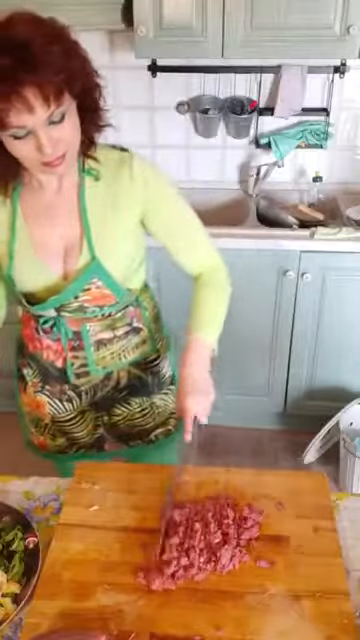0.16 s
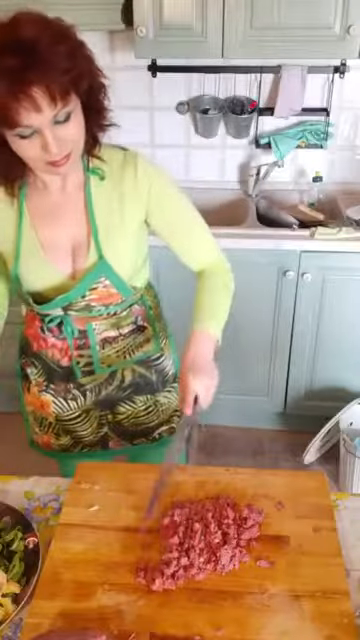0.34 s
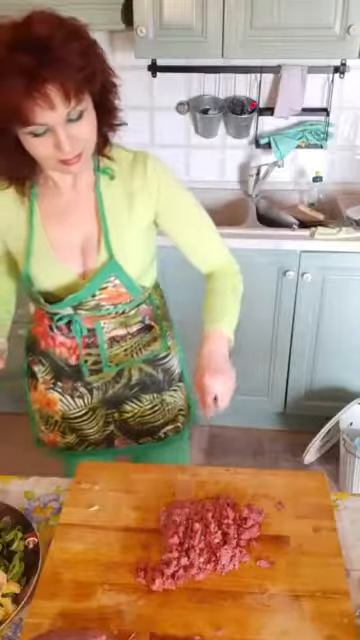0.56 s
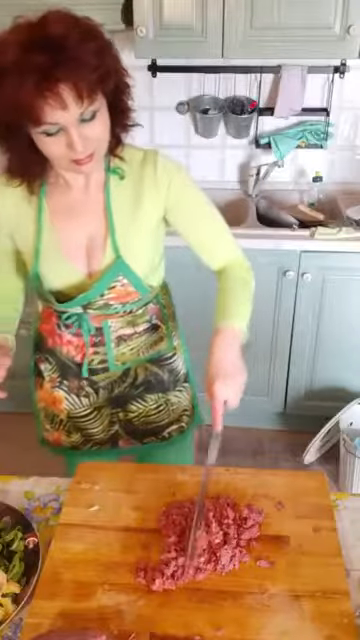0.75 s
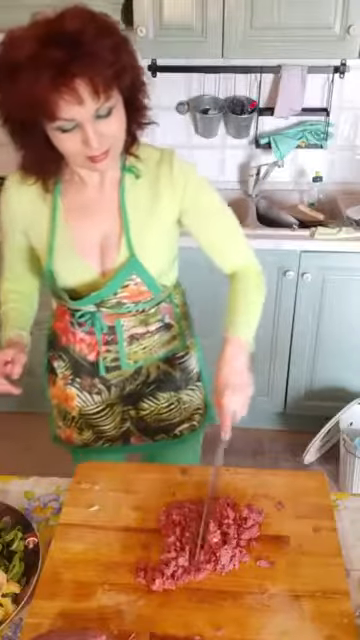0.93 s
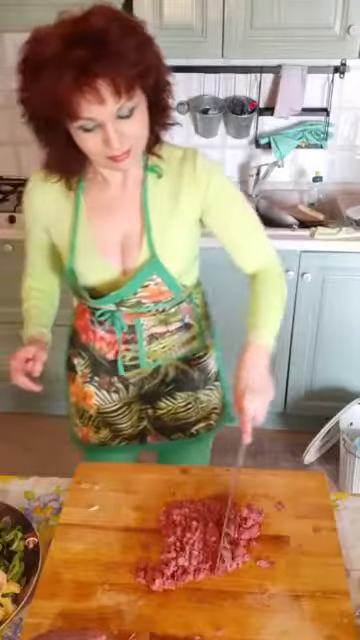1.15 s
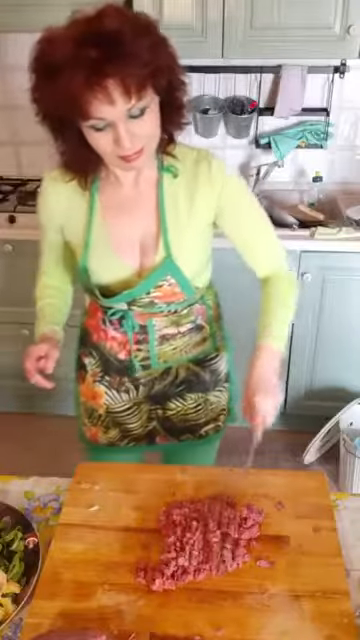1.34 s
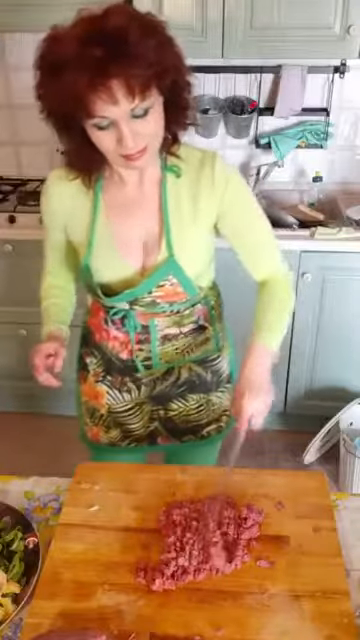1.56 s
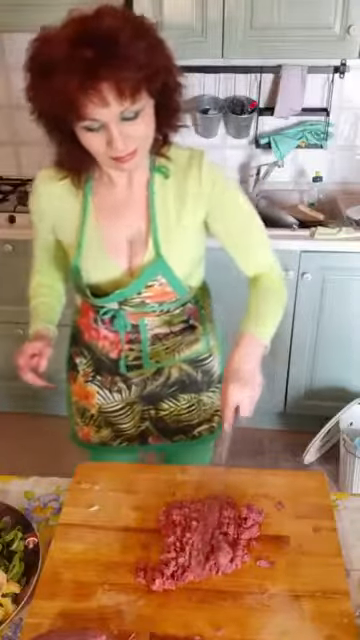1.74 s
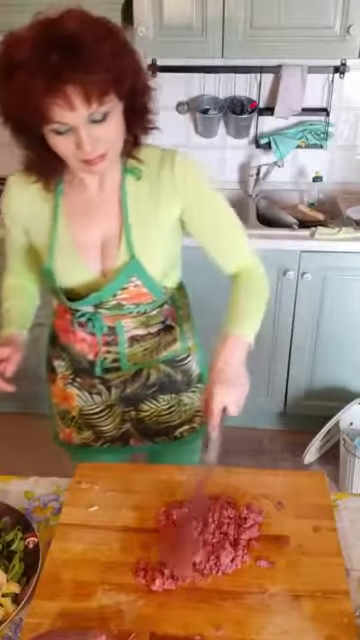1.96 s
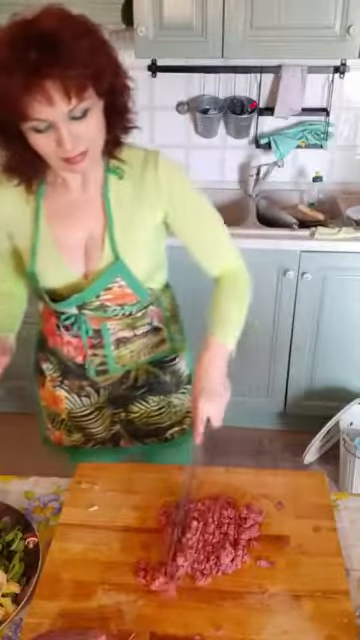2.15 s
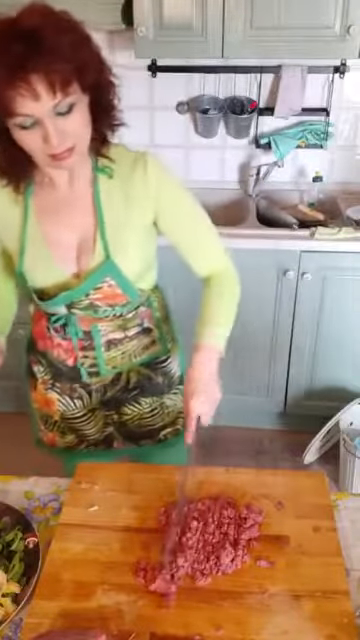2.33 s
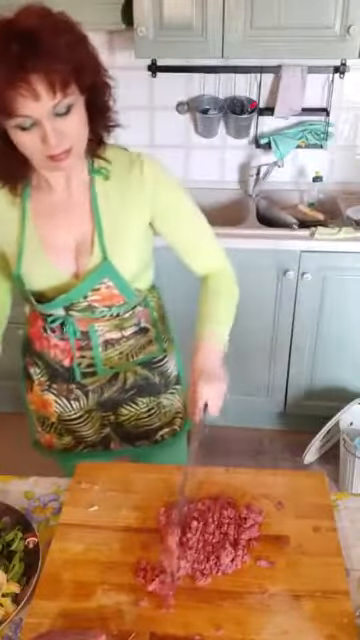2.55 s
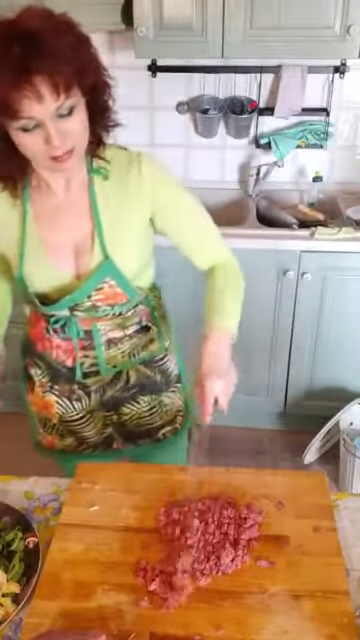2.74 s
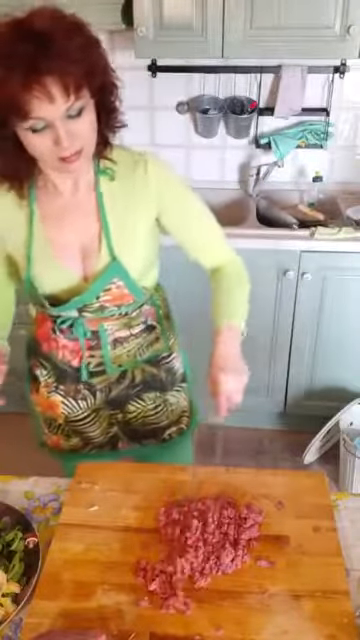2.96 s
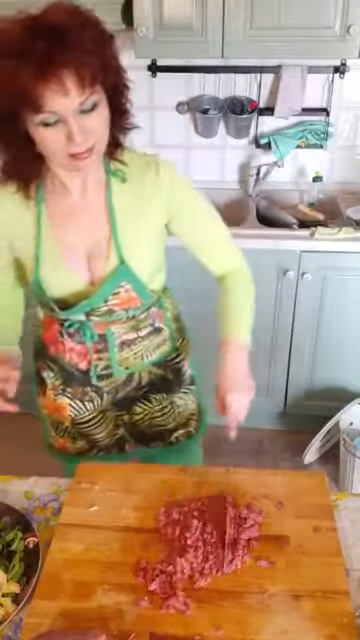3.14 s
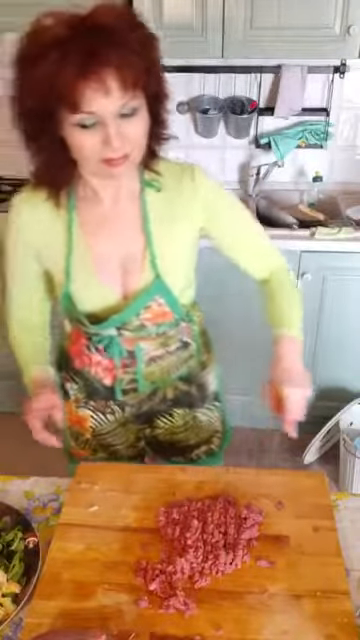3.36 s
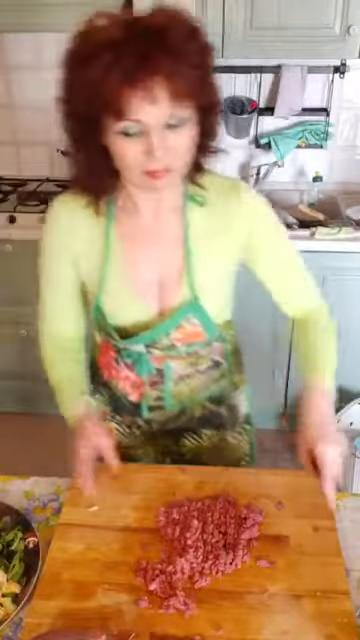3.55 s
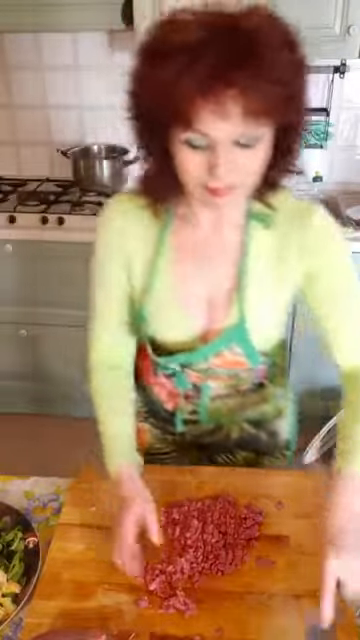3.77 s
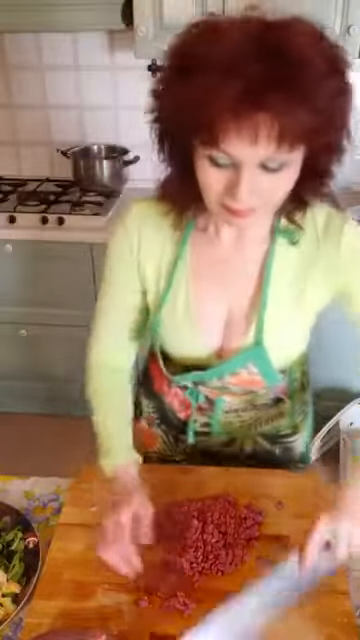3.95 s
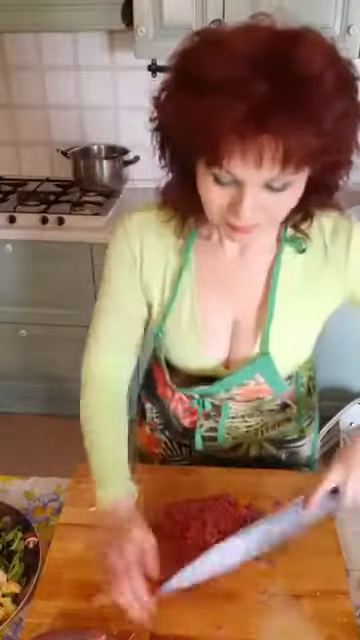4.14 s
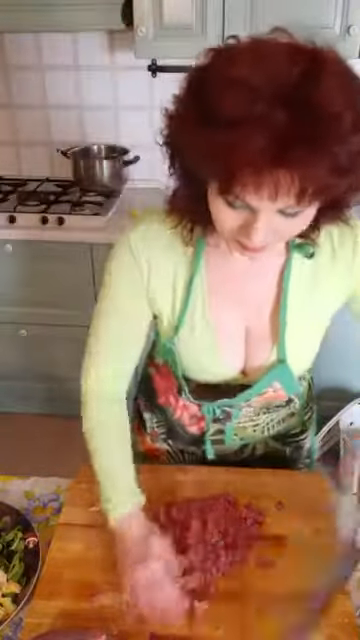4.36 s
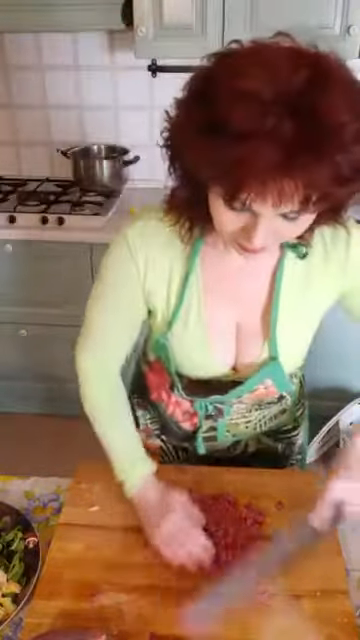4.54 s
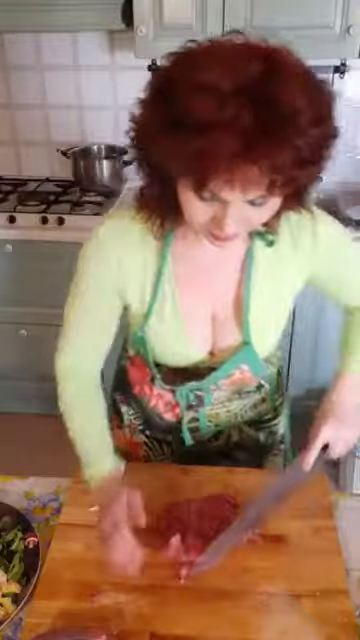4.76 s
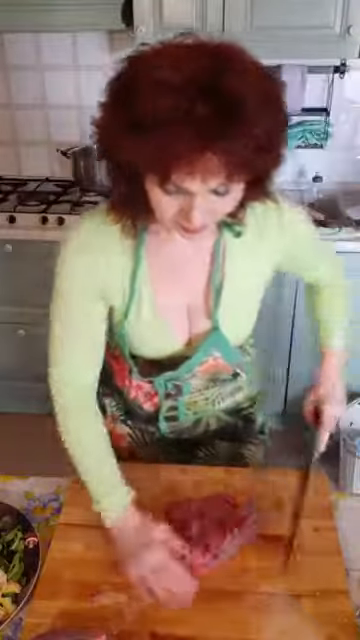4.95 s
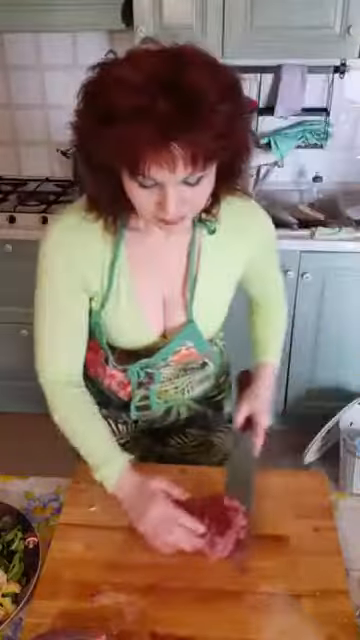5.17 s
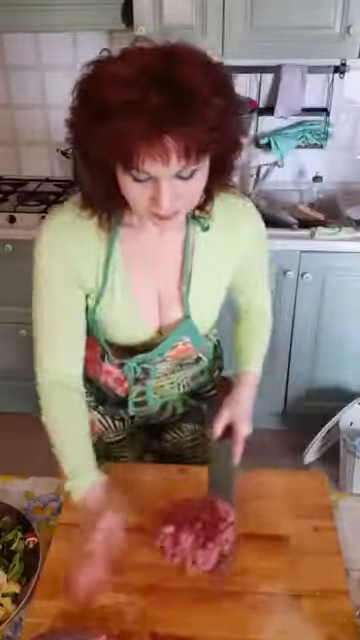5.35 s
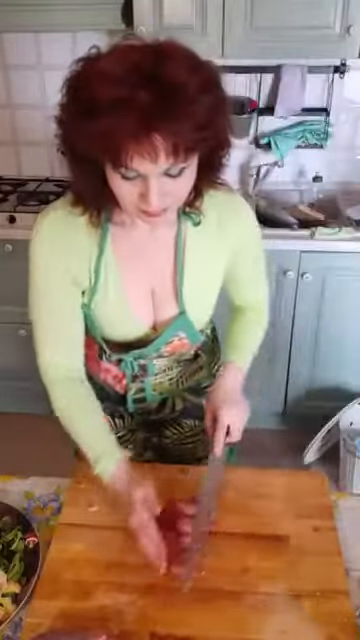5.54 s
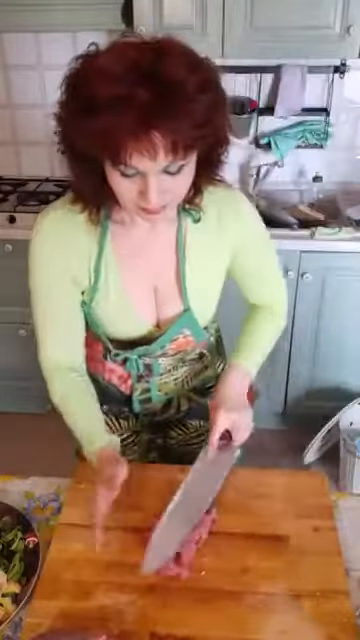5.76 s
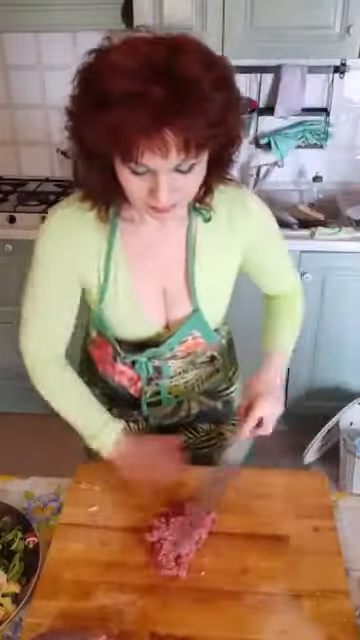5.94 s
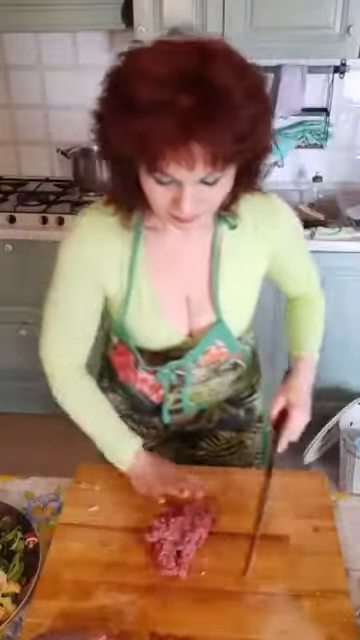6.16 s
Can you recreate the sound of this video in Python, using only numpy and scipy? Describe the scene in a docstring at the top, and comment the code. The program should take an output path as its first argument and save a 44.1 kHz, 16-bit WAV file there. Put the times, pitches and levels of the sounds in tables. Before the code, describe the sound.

A large knife chops minced meat on a thick wooden board, about four loud knocks a second, then scrapes and pats the meat together.

```python
"""A large knife chops minced meat on a thick wooden board, four blows a second, in a hard-walled kitchen.
Each blow is a short pulse shaped by meat, wood and steel, with crunch, hiss, spray and ringing tones.
Then the blade is set down and scrapes the meat together (juddering noise and a rough moan) while a hand
pats it into a heap (soft noise swells), and sticky meat peels off in a rustle.
The room rings on in scattered echoes and standing waves; an appliance hums faintly as steady tones in air noise."""
import sys
import numpy as np
from scipy import signal
from scipy.fft import rfft, irfft, next_fast_len
from scipy.io import wavfile
from scipy.ndimage import uniform_filter1d

SR = 44100
rng = np.random.default_rng(int(sys.argv[2]) if len(sys.argv) > 2 else 0)


def transcribe(signal):
    """Save signal, clipped to [-1, 1], as a 16-bit WAV file at the path in sys.argv[1]."""
    frames = np.atleast_2d(signal).T
    limited = np.clip(frames, -1, 1)
    pcm = np.round(limited * 32767).astype(np.int16)
    wavfile.write(sys.argv[1], SR, pcm)


N = 273420

# spectral shape of wet meat, as smack, hiss or rustle: (f/Hz, relative level/dB per Hz)
WET_MEAT = [(200, -21.5), (900, -9), (2000, -5.5), (4500, 0.5), (8000, -12), (15000, -12.5)]


def amp(db):
    """Decibels to gain."""
    return 10 ** (np.asarray(db) / 20)


def unit(x):
    """Scale to rms 1."""
    return x / np.sqrt(np.mean(x ** 2) + 1e-20)


def along(points, hz):
    """Read (f/Hz, value) points on a log frequency axis."""
    f, v = np.transpose(points)
    return np.interp(np.log(hz + 1), np.log(f + 1), v)


def filtered(x, response):
    """Multiply the spectrum of x by a response of frequency."""
    n = x.shape[-1]
    m = next_fast_len(n + SR // 10)
    hz = np.fft.rfftfreq(m, 1 / SR)
    return irfft(rfft(x, m) * response(hz), m)[..., :n]


def coloured(x, spectrum):
    """Give x a (f/Hz, level/dB) colour, at rms 1."""
    return unit(filtered(x, lambda hz: amp(along(spectrum, hz))))


def causal(gain):
    """The sharpest-starting (minimum-phase) pulse that has this gain spectrum."""
    cepstrum = irfft(np.log(np.maximum(gain, 1e-6)))
    half = len(cepstrum) // 2
    cepstrum[1:half] *= 2
    cepstrum[half + 1:] = 0
    return irfft(np.exp(rfft(cepstrum)))


def add(track, s, sound):
    """Mix a sound into the track from time s."""
    part = track[..., max(round(s * SR), 0):][..., :sound.shape[-1]]
    part += sound[..., :part.shape[-1]]


def gritty(n, grit_db, rate):
    """Rough noise: its level wanders between random values, rate of them a second."""
    knots = rng.standard_normal(SR)
    level = np.interp(np.arange(n) * rate / SR, np.arange(SR), knots)
    return unit(rng.standard_normal(n) * amp(grit_db * level))


def diffuse(pair):
    """Two unrelated signals become a sound field: alike in the bass, loosely related or opposed above."""
    # likeness of the sound at the two microphones: (f/Hz, correlation -1..1)
    alike = [(60, 0.99), (180, 0.95), (350, 0.88), (700, 0.28), (1300, -0.34), (2500, 0.25), (8000, -0.28)]

    def mid_and_side(hz):
        turn = np.arccos(np.clip(along(alike, hz), -1, 1)) / 2
        return np.array([np.cos(turn), np.sin(turn)])

    mid, side = filtered(pair, mid_and_side)
    return np.array([mid + side, mid - side])


def reflections(build=0.0012, hold=0.029, sparse_db=3, sparse_time=0.055):
    """The walls' answer: scattered echoes thicken into an even tail, fading at a rate set by frequency."""
    # the kitchen's decay: (f/Hz, t60/s)
    kitchen = [(80, 0.94), (200, 0.62), (550, 0.6), (1500, 0.74), (4000, 0.67), (7000, 0.53), (14000, 0.26)]
    t = np.arange(SR) / SR
    unevenness_db = sparse_db * np.exp(-t / sparse_time) * rng.standard_normal((2, SR))
    echoes = rng.standard_normal((2, SR)) * amp(unevenness_db)
    echoes *= 1 - np.exp(-(t / build) ** 2)
    hz, age, z = signal.stft(echoes, SR, nperseg=256)
    z = z * amp(-60 * np.maximum(age - hold, 0) / along(kitchen, hz)[:, None])
    tail = signal.istft(z, SR, nperseg=256)[1][:, :SR]
    spectrum = rfft(tail, 2 * SR)
    # level the smoothed spectrum so that the tail has no broad colour of its own
    smooth = np.sqrt(np.abs(uniform_filter1d(np.abs(spectrum) ** 2, size=160, axis=1)))
    return diffuse(irfft(spectrum / smooth)[:, :SR])


def standing_waves(level_db=-61, build=0.036):
    """A few room modes ring on as decaying sines within the tail."""
    # standing waves of the kitchen: (f/Hz, relative level/dB, t60/s)
    modes = [(100, -12, 0.48), (118.4, -9.5, .75), (160.4, -4.5, 0.81), (286, -5.5, 0.55), (533, 2, 0.26),
             (774, 4.5, 0.56), (900, 3, .7), (1014, -1, .7), (1101, 5, 0.45), (1306, -2, .7)]
    t = np.arange(SR) / SR
    waves = np.zeros((2, SR))
    for hz, db, t60 in modes:
        phase = rng.uniform(0, 2 * np.pi, (2, 1))
        waves += amp(db - 60 * t / t60) * np.sin(2 * np.pi * hz * t + phase)
    return diffuse(amp(level_db) * waves * (1 - np.exp(-t / build)))


def in_kitchen(sound, walls, wet_db, change=0.09, lag=0.00038):
    """Direct sound plus room; a share of the echoes is new for each sound, as the knife and the cook move."""
    # distinct echoes from board, cook and cupboards: (delay left/s, delay right/s, level re direct/dB)
    near = [(.0015, 0.00085, -4.5), (.0086, 0.009, -7.5), (.0176, 0.024, -7.5), (.0241, 0.027, -8)]
    response = amp(wet_db) * (np.sqrt(1 - change) * walls + np.sqrt(change) * reflections())
    direct = (lag, 0, 0)  # the left ear hears it a little later
    for left, right, db in [direct] + list(near):
        response[[0, 1], [round(left * SR), round(right * SR)]] += amp(db)
    return signal.fftconvolve(sound[None], response, axes=1)


def through_blade(force, ring_db, vary_db=2):
    """The steel rings along with what touches it; clinging meat shifts each tone a little."""
    # thin ringing tones of the blade, before random variation: (f/Hz, relative level/dB, t60/s)
    tones = [(2700, -5.5, .16), (3140, -4, 0.16), (3210, -1, .18), (3690, 0, 0.12), (4320, 4, .17),
             (5340, 3.5, 0.12), (6500, -5, 0.17), (8040, 4.5, 0.24), (8730, 0, .15), (9200, -4.5, .12)]
    t = np.arange(SR // 4) / SR
    ring = np.zeros(len(t))
    for hz, db, t60 in tones:
        strength_db = db + vary_db * rng.standard_normal()
        shifted_hz = hz * (1 + .015 * rng.standard_normal())
        ring += amp(strength_db - 60 * t / t60) * np.cos(2 * np.pi * shifted_hz * t)
    ring *= amp(ring_db)
    ring[0] += 1  # the contact itself
    return signal.fftconvolve(force, ring)


def blow(thud_db, knock_db, edge_db, wood_db, vary_db=2.76, crunch_db=6, crunch_time=0.0039, size=4096):
    """The edge crunches through the meat and strikes the wood; each blow rings a little differently."""
    # where thud, knock, plain wood, bite and edge lie in a blow: (f/Hz)
    registers = [130, 310, 1400, 2300, 4500]
    # spectral shape of one blow through meat into wood: (f/Hz, relative level/dB per Hz)
    chop = [(40, -24), (64, -18), (82, -6), (120, -3.5), (165, -2.5), (230, -10), (400, -9.5), (600, -5.5),
            (1000, 1), (1500, -1), (1900, -7), (3000, -20), (5000, -25.5), (7500, -38), (15000, -55.5)]
    # resonances of the board and the blade in it, before random variation: (f/Hz, width/Hz, lift/dB)
    board = [(300, 19, 1.5), (552, 88, 4), (931, 92, -0.5), (1560, 250, 3), (2385, 350, 6.5),
             (3510, 420, 4.5), (4080, 470, 5.5), (5330, 580, 1)]
    hz, t = np.fft.rfftfreq(size, 1 / SR), np.arange(size) / SR

    def peak(centre, width):
        return 1 / (1 + (2 * (hz - centre) / width) ** 2)

    rings_db = wood_db * peak(1450, 550)
    for f, width, lift_db in board:
        shift = 1 + .025 * rng.standard_normal()
        rings_db += (lift_db + vary_db * rng.standard_normal()) * peak(f * shift, width)
    # a bare edge bites into the wood, meat muffles it
    bite_db = -.2 + .62 * edge_db - .4 * thud_db
    contact_db = along(list(zip(registers, [thud_db, knock_db, 0, bite_db, edge_db])), hz)
    pulse = causal(unit(amp(along(chop, hz) + rings_db)) * amp(contact_db))
    # differencing tilts the noise of tearing fibres to the treble
    crunch = np.diff(rng.standard_normal(size) * np.exp(-t / crunch_time), prepend=0)
    force = amp(crunch_db) * crunch / np.linalg.norm(crunch)
    force[0] += 1  # the impact
    return through_blade(signal.fftconvolve(force, pulse)[:size], ring_db=-52.5)


def earlier_blow(walls, before=0.092, level_db=8):
    """The chopping is already under way: the room still rings from the blow before."""
    whole = amp(level_db) * in_kitchen(blow(0, 0, 0, 0), walls, wet_db=1.5)
    ring = whole[:, round(before * SR):]
    return np.pad(ring, ((0, 0), (0, N - ring.shape[1])))


def background(air_db=-72):
    """Still air as coloured noise, and the hum of an appliance as steady sines."""
    # spectral shape of the air noise: (f/Hz, relative level/dB per Hz)
    air = [(18, -41.5), (30, -3.5), (70, 2), (345, -10), (584, -8.5), (760, -9.5), (937, -22.5), (1960, -8),
           (3140, -19.5), (4780, -13.5), (8080, -21), (9710, -22), (16000, -13.5)]
    # appliance tones before they are spread in stereo: (f/Hz, level/dB rms)
    hum_tones = [(85, -85.5), (147, -86), (640, -93), (738, -90), (787, -82)]
    t = np.arange(N) / SR
    hum = np.zeros((2, N))
    for hz, db in hum_tones:
        hum += amp(db) * np.sqrt(2) * np.sin(2 * np.pi * (hz * t + rng.random((2, 1))))
    hiss = coloured(diffuse(rng.standard_normal((2, N))), air)
    return amp(air_db) * hiss + diffuse(hum)


def struck(hz, t60, attack):
    """One mode of blade, board or table, set swinging by a blow: a decaying sine."""
    t = np.arange(SR // 4) / SR
    return np.sin(2 * np.pi * hz * t) * amp(-60 * t / t60) * (1 - np.exp(-t / attack))


def squelch(rise=.012, length=0.14):
    """Juice and fibres are squeezed out beside the blade in a short crackling spray."""
    # spectral shape of wet meat squirting from under the edge: (f/Hz, relative level/dB per Hz)
    spray = [(1000, -18.5), (3000, 2.5), (5000, 5), (7500, 0), (10000, -12), (15000, -11.5)]
    t = np.arange(SR // 5) / SR
    crackle = np.array([gritty(len(t), grit_db=4, rate=500) for channel in range(2)])
    return coloured(crackle, spray) * (1 - np.exp(-t / rise)) * np.exp(-(t / length) ** 2)


def chopping(walls, lead=0.0063, slice_db=-48, spray_db=-55, tick_db=-28.5, clack_db=-19.0,
             thump_db=-33, thump_growth=2.8):
    """The edge hisses into the meat, then the blow; close by, steel ticks, board clacks, table thumps."""
    # the blade meets the board: (t/s, blow level/dB, cushioning by the meat/dB, steel edge/dB)
    blows = [(0.0492, 8, -2.5, 0.5), (0.2838, 10, -6, -2), (0.528, 10, -6, -1), (0.767, -3.5, 10, -5.5),
             (1.0, 8, -3.5, -1.5), (1.246, 9, -2.5, -4.5), (1.486, 9, -3.5, -2), (1.7339, 8, -1, 4),
             (1.9759, 8, 0, -2.5), (2.2277, 7.5, -1.5, -0.5), (2.472, 8.7, 0, 1.3), (2.7199, 9.5, -4, -1.5),
             (2.9577, 10.4, -4.5, -1.5), (3.196, 10.3, -5, -1.3), (3.8607, -13, 1, 17.5),
             (4.4577, -3, -6.5, -5), (5.043, -3.8, 4.5, -2.5)]
    track = np.zeros((2, N))
    for s, db, cushion_db, edge_db in blows:
        knock_db = 5.8 + .65 * cushion_db + .45 * edge_db  # the hollow knock
        wood_db = 2 + 0.53 * rng.standard_normal()  # the woody clack differs from spot to spot
        sound = blow(cushion_db, knock_db, edge_db, wood_db)
        add(track, s, amp(db) * in_kitchen(sound, walls, wet_db=10.0))
        spot = np.exp(.08 * rng.standard_normal())
        # a cushioned blow ticks less and puts more of its push into the table
        tick = amp(tick_db + (edge_db - cushion_db) / 2) * struck(hz=5000 * spot, t60=0.0068, attack=.0003)
        thump = amp(thump_db + thump_growth * cushion_db) * struck(hz=142, t60=0.016, attack=0.0026)
        clack = amp(clack_db + wood_db) * struck(hz=1476, t60=0.021, attack=0.00017)
        add(track, s, amp(db) * (tick + clack + thump))
        add(track, s, amp(db + edge_db + spray_db) * squelch())
        hiss = coloured(rng.standard_normal((2, round(lead * SR))), WET_MEAT)
        add(track, s - lead, amp(db + slice_db) * hiss * np.linspace(0, 1, hiss.shape[1]))
    return track


def swell_and_fade(t, rise, length, fade_db_per_s):
    """A smooth rise, a hold until length, then a steady fall in dB."""
    swell = np.sin(np.pi / 2 * np.minimum(t / rise, 1)) ** 2
    return swell * amp(-fade_db_per_s * np.maximum(t - length, 0))


def moan(pitch, width_hz=38):
    """The dragged blade bends and chatters in a rough, wavering tone that the table carries."""
    n = len(pitch)
    sway = unit(filtered(rng.standard_normal((2, n)), lambda hz: 1 / (1 + (hz / width_hz) ** 2)))
    phase = 2 * np.pi * np.cumsum(pitch) / SR
    return unit((1 + sway[0]) * np.cos(phase) + sway[1] * np.sin(phase))


def scraping(walls, press_s=0.13, lift_db_per_s=279, gather_db_per_s=41,
             moan_rise_s=.2, moan_fade_db_per_s=140, moan_bend=.12):
    """The edge judders over the grain; meat gathering under it fills out the low part of the rub."""
    # the blade sweeps over the wood; the meat level is where its growth starts:
    # (start t/s, length/s, rub level/dB, meat under the blade/dB, moan f/Hz, moan level/dB)
    sweeps = [(3.868, 0.25, -48, -10.5, 471.6, -50.5), (4.512, 0.23, -42, -6.5, 376, -50.5)]
    # spectral shape of steel rubbing wood: (f/Hz, relative level/dB per Hz)
    steel_on_wood = [(40, -30), (120, -19.5), (280, 1.5), (800, 2), (1500, 7), (2100, -3), (3200, 2),
                     (4300, 1.5), (5500, -6), (7000, -5), (10000, -8), (15000, -15)]
    track = np.zeros((2, N))
    t = np.arange(SR // 2) / SR
    for s, length, rub_db, meat_db, moan_hz, moan_db in sweeps:
        # pressure builds up, holds, and falls as the blade lifts
        pressure = swell_and_fade(t, press_s, length, lift_db_per_s)
        judder = gritty(len(t), grit_db=3, rate=400)
        rub = coloured(judder, steel_on_wood)
        low = filtered(rub, lambda hz: 1 / (1 + (hz / 1400) ** 2))
        # meat piles up in front of the moving blade
        gathered = amp(meat_db + gather_db_per_s * t) * low
        rub = amp(rub_db) * pressure * (rub - low + gathered)
        add(track, s, in_kitchen(through_blade(rub, ring_db=-46), walls, wet_db=-6.5))
        # the moan builds slowly and starts flat by the share moan_bend
        chatter = swell_and_fade(t, moan_rise_s, length, moan_fade_db_per_s)
        pitch = moan_hz * (1 - moan_bend * np.maximum(1 - t / moan_rise_s, 0))
        add(track, s, amp(moan_db) * chatter * moan(pitch))
    return track


def patting(walls):
    """Each press of the hand is a soft swell on the board with sticky crackle on top."""
    # the hand presses and shifts the meat: (loudest t/s, length/s, level/dB, wet smack re push/dB)
    pats = [(4.898, .06, -62, -9), (5.019, .012, -57, -26), (5.171, .06, -47, -17), (5.245, .04, -54, -3),
            (5.399, .045, -55, -5)]
    # spectral shape of a soft push on the board: (f/Hz, relative level/dB per Hz)
    soft_push = [(40, -17), (90, -6), (170, -0.5), (300, -3.5), (600, -6), (1400, -11), (2300, -18.5),
                 (8000, -56.5)]
    track = np.zeros((2, N))
    t = np.arange(-SR // 5, SR // 5) / SR
    for s, length, db, smack_db in pats:
        push = coloured(rng.standard_normal(len(t)), soft_push)
        smack = coloured(gritty(len(t), grit_db=5, rate=600), WET_MEAT)
        swell = amp(db) * np.exp(-2 * (t / length) ** 2)
        add(track, s + t[0], in_kitchen(swell * (push + amp(smack_db) * smack), walls, wet_db=1.0))
    return track


def peeling(walls, peak_s=5.62, level_db=-70.5, rise=0.1, fade_db_per_s=38.5):
    """Sticky meat lets go of fingers and blade in a faint rustle that dies away."""
    t = np.arange(SR) / SR
    rustle = coloured(gritty(len(t), grit_db=4, rate=90), WET_MEAT)
    rustle = amp(level_db) * rustle * swell_and_fade(t, rise, rise, fade_db_per_s)
    track = np.zeros((2, N))
    add(track, peak_s - rise, in_kitchen(rustle, walls, wet_db=-9.5))
    return track


def scene():
    """All the work shares one room and two microphones; the left one hears less treble."""
    # colour of the two microphones: (f/Hz, gain/dB)
    left_port = [(4500, 1.5), (6500, 0.5), (9000, -6), (15000, -0.5)]
    right_port = [(700, 1.5), (1300, 2.5), (4500, 1.5), (15000, 8)]
    walls = reflections() + standing_waves()
    work = earlier_blow(walls) + chopping(walls) + scraping(walls) + patting(walls) + peeling(walls)
    heard = filtered(work, lambda hz: amp([along(left_port, hz), along(right_port, hz)]))
    return heard + background()


def record(dry, top_hz=15900):
    """The highest peaks are rounded off softly and nothing is kept above the band limit."""
    rounded = dry / (1 + np.abs(dry) ** 6) ** (1 / 6)
    return filtered(rounded, lambda hz: hz < top_hz)


dry = scene()
out = record(dry)
transcribe(out)
```